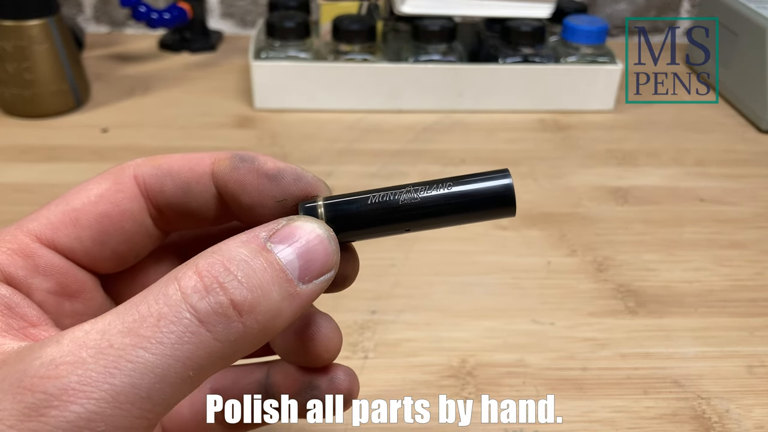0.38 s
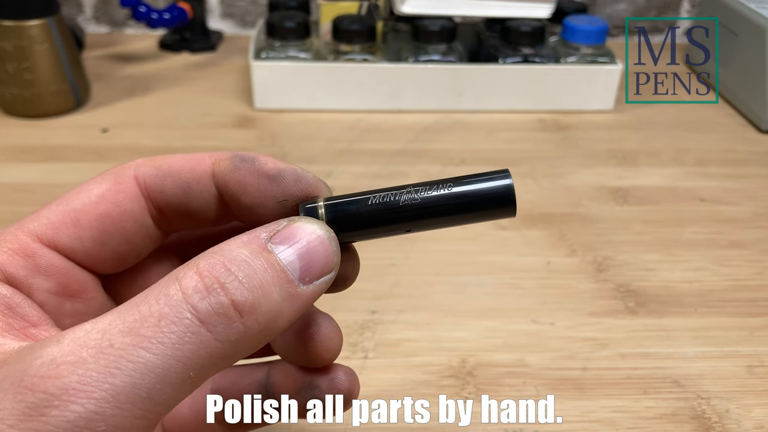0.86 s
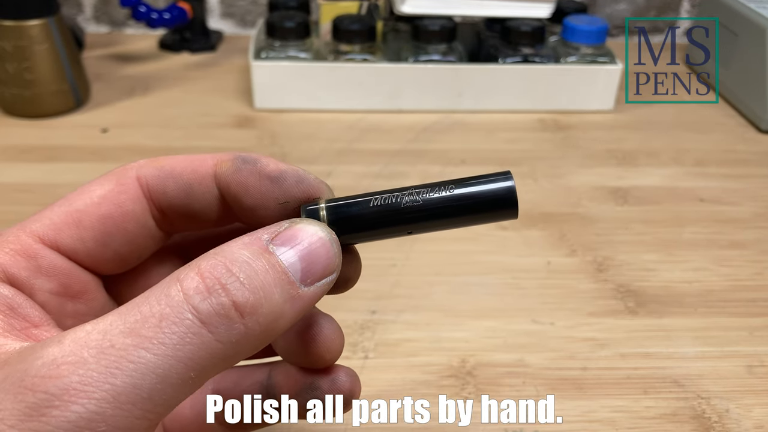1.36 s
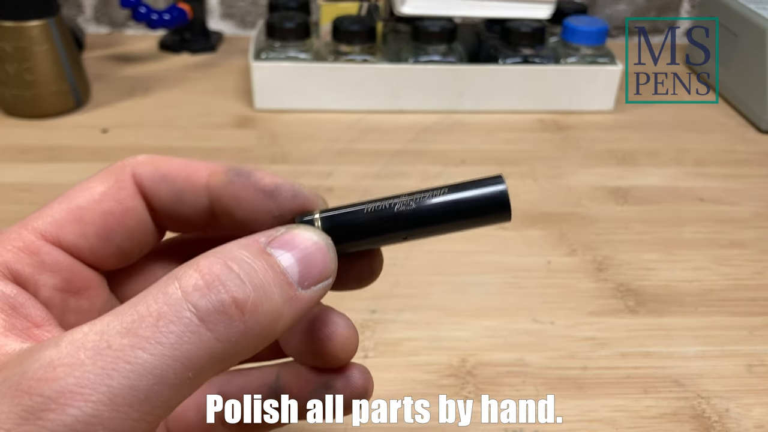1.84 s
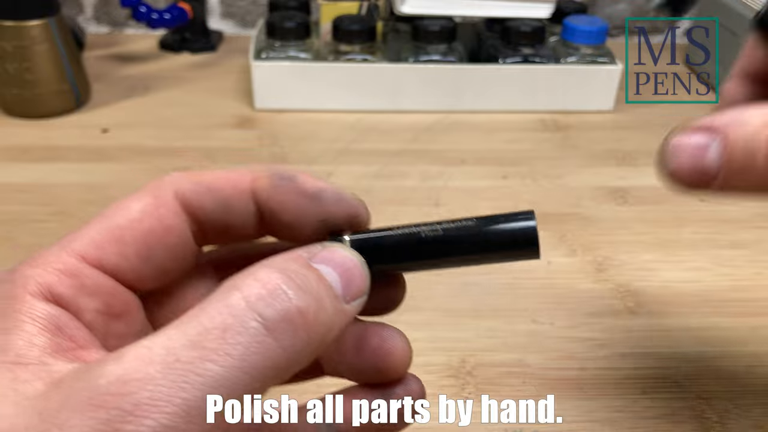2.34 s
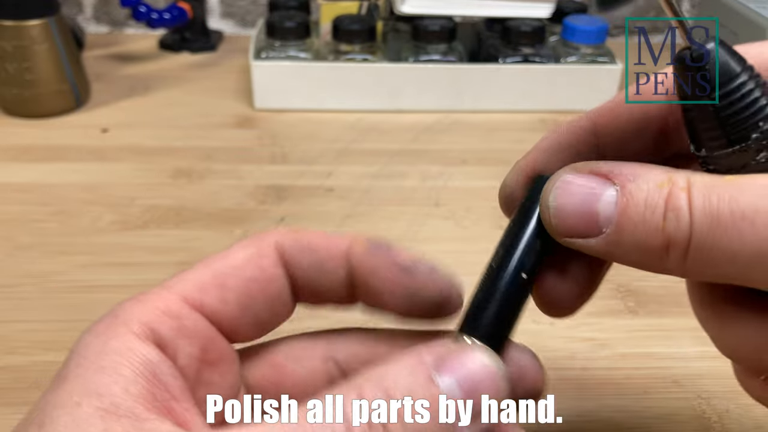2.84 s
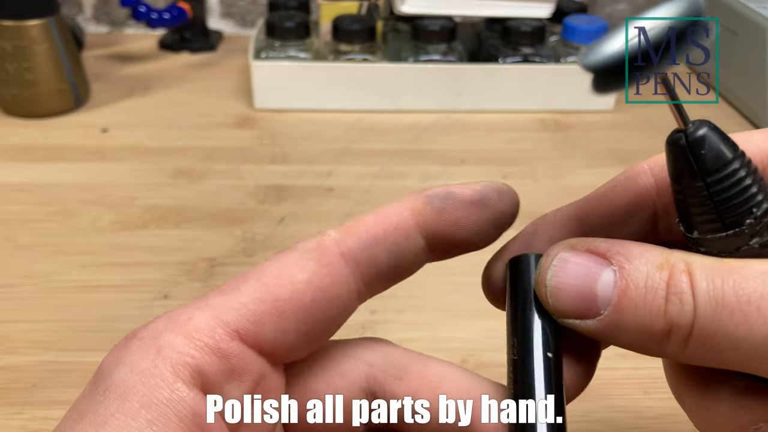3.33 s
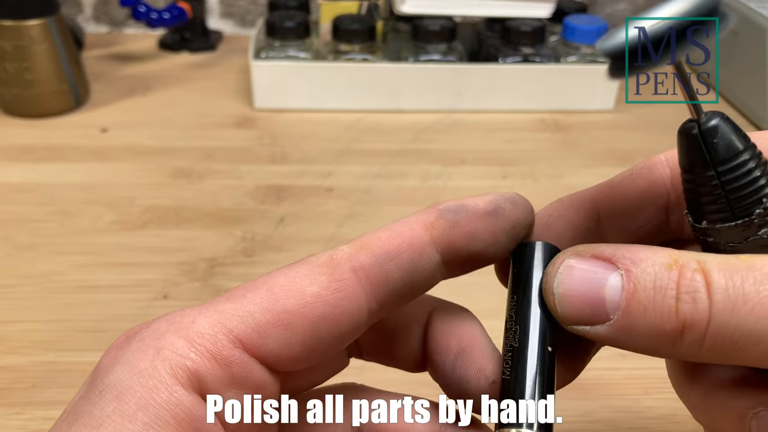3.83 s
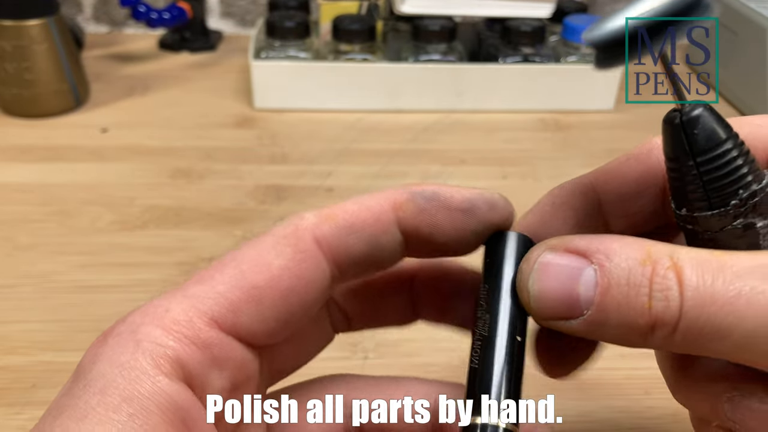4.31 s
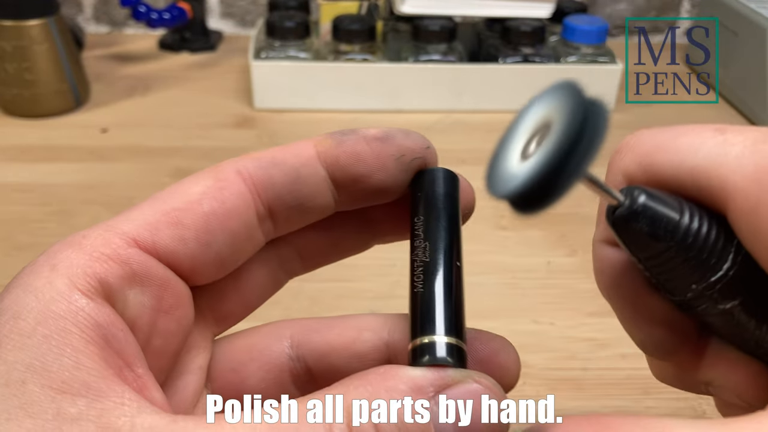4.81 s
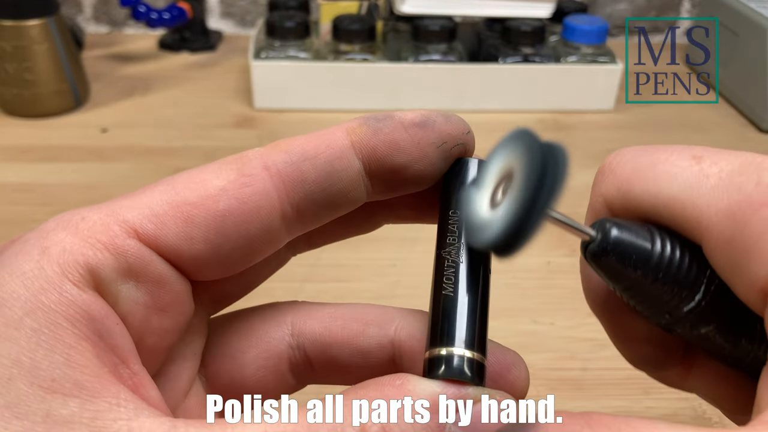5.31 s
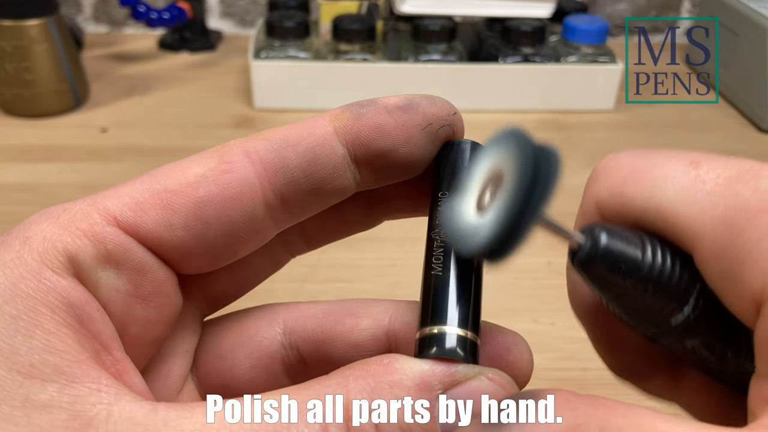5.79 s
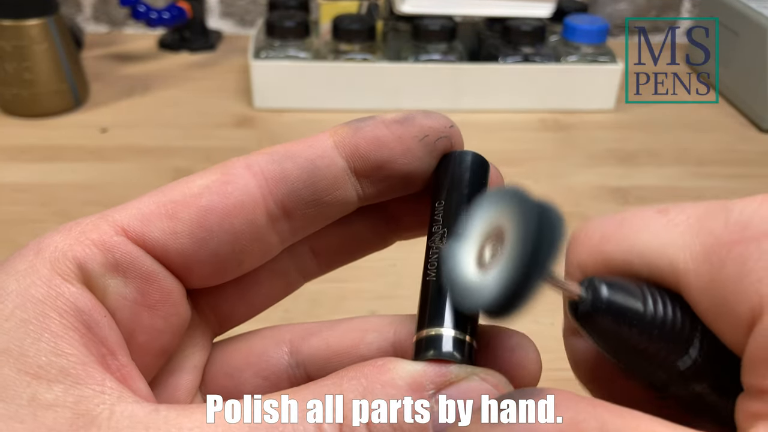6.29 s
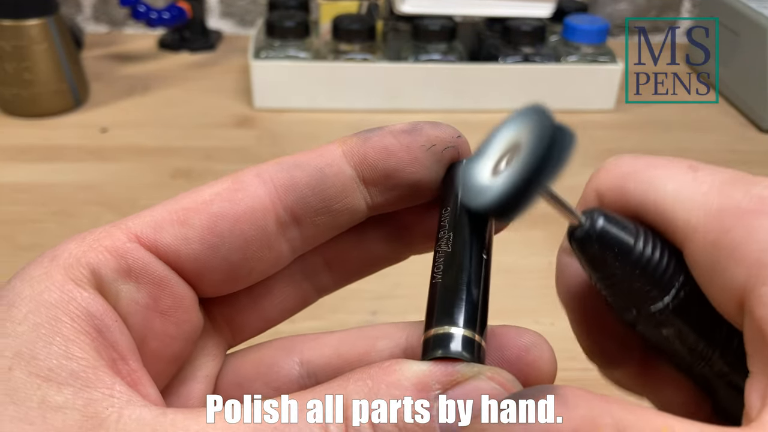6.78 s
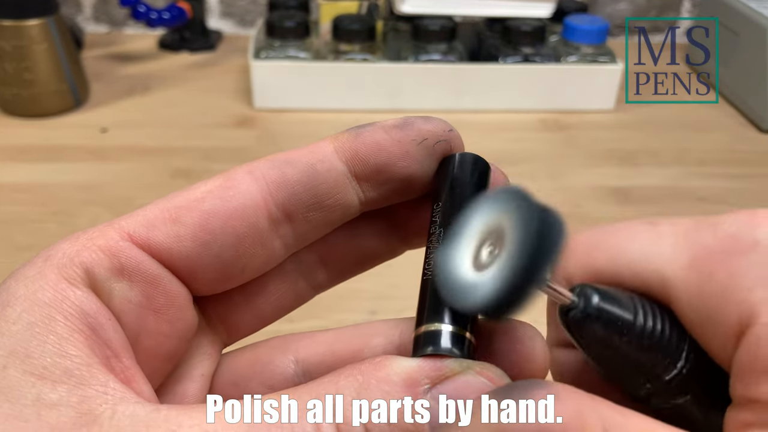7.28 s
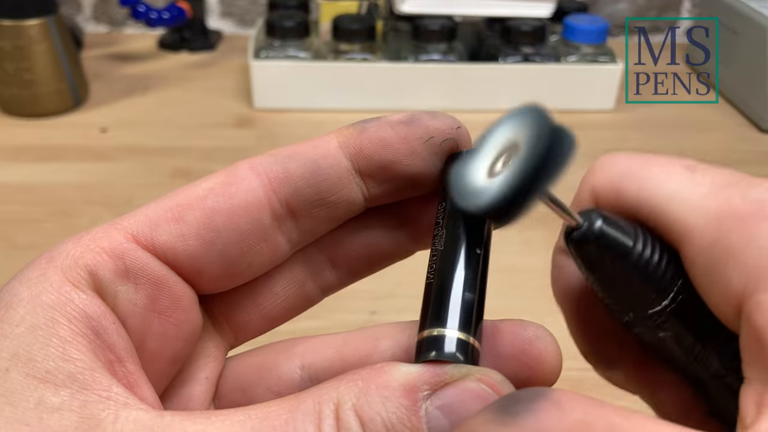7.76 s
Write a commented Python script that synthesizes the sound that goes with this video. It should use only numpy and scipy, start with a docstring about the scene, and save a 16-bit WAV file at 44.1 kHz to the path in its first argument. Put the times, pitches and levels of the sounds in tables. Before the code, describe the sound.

A small rotary tool whines faintly, is braked almost to a crawl, spins up loud and steady, then bogs and rasps against a plastic barrel.

```python
"""A small rotary tool with a soft polishing wheel runs close to a stereo microphone above a wooden bench.
Its motor sings on multiples of the shaft speed; brushes, bearings, air and rubbing add shaped noise.
It is braked almost to a crawl, spins up to its free whine, then bogs and recovers as the wheel is stroked
along a plastic barrel, which rings and is slapped once a turn by a high spot of the wheel.
Hands bump the bench softly as lumpy low noise; dull echoes and faint room air surround it all."""
import sys
import numpy as np
from scipy import signal
from scipy.fft import rfft, irfft, next_fast_len
from scipy.io import wavfile
from scipy.ndimage import uniform_filter1d

SR = 44100
rng = np.random.default_rng(int(sys.argv[2]) if len(sys.argv) > 2 else 0)


def waveform_to_disk(signal):
    """Save audio, clipped to [-1, 1], as 16-bit WAV at the path in sys.argv[1]."""
    frames = np.transpose(np.atleast_2d(signal))
    scaled = np.clip(frames, -1, 1) * 32767
    samples = np.round(scaled).astype(np.int16)
    wavfile.write(sys.argv[1], SR, samples)


def linear_from_db(decibels):
    """Turn decibels (scalar or array-like) into linear amplitude factors; 0 gives 1."""
    return 10 ** (np.asarray(decibels, float) / 20)


N = 347949

FREE_SPEED_HZ = 238.2  # turns per second when nothing brakes the shaft

# How alike the two ports (the stereo channels) are. Each row: frequency in Hz, share in common from 0 to 1.
LIKENESS = [(200, 0.8), (1000, 0.7), (2300, 0.8), (3200, 0.45), (4500, .5), (5500, 0.65), (6200, .65),
            (6700, .94), (9000, 0.93), (12000, 0.9), (15500, .85)]
# Noise colour of the tool turned aside. Each row: frequency in Hz, relative density in dB per Hz.
ASIDE = [(60, -9), (200, -3), (300, -4.5), (550, -13.5), (760, -0.5), (1150, -16), (1450, -9),
         (1850, -12.5), (2100, -4.5), (2400, -4.5), (2650, -14.5), (3080, 0), (3450, -14), (4300, -9),
         (4550, -1), (4900, -8), (5500, -13), (8000, -8.5), (11000, -2.5), (15500, -17)]


def rms_one(x):
    """Scale to rms 1."""
    return x / np.sqrt(np.mean(x ** 2) + 1e-20)


def in_time(rows):
    """Turn each column of a timed table into one value per sample, by straight lines."""
    s, *columns = np.transpose(rows)
    return [np.interp(np.arange(N) / SR, s, c) for c in columns]


def at_hz(points, hz):
    """Read a spectrum on a log-frequency axis."""
    points = np.array(points)
    return np.interp(np.log(hz + 1), np.log(points[:, 0]), points[:, 1])


def drift(rate, channels=1):
    """Slow chance of spread 1: noise at every 32nd sample through a double one-pole with its corner at rate Hz."""
    r = np.exp(-64 * np.pi * rate / SR)
    noise = rng.standard_normal((channels, N // 32 + 3001))
    slow = signal.lfilter([1], [1, -2 * r, r * r], noise)[:, 3000:]  # skip the settling of the filter
    slow = slow / slow.std(axis=1, keepdims=True)
    return np.repeat(slow, 32, axis=1)[:, :N]


def shaped(x, gain):
    """Multiply the spectrum by gain(Hz)."""
    size = next_fast_len(N + 4096)
    hz = np.arange(size // 2 + 1) * SR / size
    return irfft(rfft(x, size) * gain(hz), size)[..., :N]


def bands(hz, order=8):
    """Weights of buzz, whine, ring and hiss, low to high; they add up to one in power."""
    edges_hz = 1590, 3600, 6440
    below = [0 * hz] + [1 / (1 + (hz / edge) ** order) for edge in edges_hz] + [1 + 0 * hz]
    return np.sqrt(np.maximum(np.diff(below, axis=0), 0))


def by_pose(pose, count=6):
    """Weights of the ways of holding the tool; they add up to one."""
    return np.clip(1 - np.abs(pose - np.arange(count)[:, None]), 0, 1)


def swells(rows):
    """Sum of smooth humps given as (centre s, length s, dB)."""
    t = np.arange(N) / SR
    return sum(linear_from_db(db) * np.cos(np.pi * np.clip((t - s) / length, -.5, .5)) ** 2 for s, length, db in rows)


def band_levels(speed, pose, rise, along, ring_db):
    """Gains of buzz, whine, ring and hiss from nearness, pose, braking and rubbing."""
    # The tool between strokes: it fades as it is braked and grows as it comes near.
    # Each row: time in seconds, base level in dB, low buzz against that level in dB.
    tool_rows = [(0, -33, -20), (.2, -37.5, -18), (.42, -38.5, -8), (.7, -37, -9.5), (.98, -41.5, -0.5),
                 (1.08, -48, 3.5), (1.3, -49, 3.5), (1.55, -61, 6.5), (1.72, -46, 1), (1.82, -37, -15),
                 (2.05, -35, -14), (2.42, -23.5, -18.5), (2.72, -21, -19.5), (3.07, -24, -19),
                 (4.35, -23, -20), (4.6, -27, -14.5), (4.8, -24, -19.5), (5.3, -29.5, -9.5),
                 (5.75, -31, -9), (6.1, -31, -12.5), (7.0, -34, -9.5), (7.65, -30.5, -10),
                 (7.89, -29.5, -15)]
    # Each row is one pose: whine, ring and hiss against the base level in dB.
    band_db = [(-4.5, -6, -2), (-5, -9, -6), (-5.5, -11, -8), (-3.5, -7, -6), (-5, -12.5, -4),
               (-6.5, -8.5, -1.5)]
    braked_db_per_octave = 1.5, -5, 6     # whine, ring, hiss while the tool is turned aside
    rise_share = 0.53, 1, 1, 0.93         # share of a stroke's rise in buzz, whine, ring, hiss
    slide_db = 2.5, 5, 4.5, 0.5           # change of each band from start to end of a stroke
    flicker_db, flicker_hz = 0.5, 11      # each band wavers on its own
    level_db, buzz_db = in_time(tool_rows)
    held = by_pose(pose)
    octaves = np.log2(speed / FREE_SPEED_HZ)
    upper_db = np.transpose(band_db) @ held + np.outer(braked_db_per_octave, held[0] * octaves)
    rubbed_db = np.outer(rise_share, rise) + np.outer(slide_db, along) + np.outer([0, 0, 1, 0], ring_db)
    flicker = flicker_db * drift(flicker_hz, channels=4)
    return linear_from_db(level_db + np.vstack([buzz_db, upper_db]) + rubbed_db + flicker)


def motor_tones(turns, speed, levels, pose, count=40):
    """Multiples of the speed, nearly in step so that they bunch once a turn; each wavers, partly apart per port."""
    # Motor tones as the housing passes them, one list for each of the first five poses.
    # Each row: multiple of the free speed, relative level in dB.
    housing = [
        [(3, -1), (4, -6), (5, 3.5), (6, 4.5), (7, -6), (8, -4), (9, -1), (10, -10), (11, 10), (12, 12),
         (13, 0), (14, 7), (15, -12), (16, -15), (17, -4), (18, 6), (19, 4), (20, -6), (21, -23), (22, -9),
         (23, -14), (24, -28)],
        [(3, -3), (4, -9), (5, -6.5), (6, -7), (7, -19), (8, -10), (9, -4), (10, 0.5), (11, -19), (12, 4),
         (13, -3), (14, 2), (15, -9), (16, -1), (17, -3), (18, -7), (19, -11), (20, 3), (21, 12), (22, -3),
         (23, -12), (24, 2)],
        [(3, -13), (4, -23), (5, -26), (6, -15), (7, -19), (8, -13), (9, -6), (10, 4), (11, 7.5), (12, -10),
         (13, 12.5), (14, 0), (15, -20), (16, 3), (17, -17), (18, 7), (19, 0), (20, -6), (21, -2), (22, -12),
         (23, -13), (24, -10)],
        [(3, -8.5), (4, -44), (5, -7.5), (6, -15), (7, -12), (8, -8), (9, -8.5), (10, 0.5), (11, 3.5), (12, -3),
         (13, 3), (14, 8.5), (15, -13.5), (16, -9.5), (17, -5), (18, -21), (19, -23), (20, -18), (21, -6),
         (22, -16), (23, -17), (24, -11)],
        [(3, -14.5), (4, -16), (5, -38), (6, -8.5), (7, -45), (8, -9), (9, -4), (10, -1.5), (11, 2), (12, 3),
         (13, 4.5), (14, 1), (15, -7), (16, -12), (17, -22), (18, -16), (19, -17), (20, -4), (21, -7),
         (22, -16), (23, -10), (24, -21)],
    ]
    # Colour of the tones at the barrel. Each row: frequency in Hz, relative level in dB.
    barrel = [(300, -45), (480, -16.5), (600, -6.5), (710, 0.5), (850, -25.5), (1020, -4.5), (1250, -14.5),
              (1450, -4.5), (1800, -14), (2250, -4.5), (2800, -2), (3400, -4.5), (4200, -1), (6000, -3)]
    # Level of the buzz, and of whine and ring together, in each pose in dB.
    buzz_db, whine_db = [0.0, -4.5, -12.0, -6.0, -4.5, -4.0], [-4.0, 0.0, -2.5, -4.0, -3.5, -7.5]
    ring_db = 0.5
    waver_db, waver_rad, waver_hz = 0.5, 0.44, 3.7
    surge_db, surge_hz, free_surge = 5.5, 12, .35  # quick surging; its share when running free
    clear_above_hz = 232                           # below this speed braking blurs the whine

    out, power = np.zeros((3, 2, N)), np.full((3, N), 1e-4)
    colours = [np.array(orders) * [FREE_SPEED_HZ, 1] for orders in housing] + [barrel]
    slow_speed, held = speed[::32], by_pose(pose[::32])
    at_barrel = by_pose(pose)[-1]
    braked = (1 - held[-1]) * np.clip((clear_above_hz - slow_speed) / 30, 0, 1)
    shaky = np.maximum(held[-1] + braked, free_surge)
    for k in range(3, count + 1):
        hz = k * slow_speed
        colour_db = sum(weight * at_hz(colour, hz) for weight, colour in zip(held, colours))
        # Braked while turned aside, the tones take the colour of the noise.
        colour_db += held[0] * braked * (at_hz(ASIDE, hz) - colour_db)
        gain = np.repeat(linear_from_db(colour_db) * bands(hz)[:3], 32, axis=1)[:, :N]
        both, level, left, right = drift(waver_hz, channels=4)
        apart = 1 - at_hz(LIKENESS, k * FREE_SPEED_HZ)
        lag = rng.normal(0, 0.5) + apart * rng.normal(0, 0.8, (2, 1))
        surge = surge_db * min(1, 8 / k) * shaky * drift(surge_hz)[0, ::32]
        flutter = np.repeat(linear_from_db(waver_db * level[::32] + surge), 32)[:N]
        waver = waver_rad * (both + apart * np.array([left, right]))
        tone = flutter * np.sin(2 * np.pi * k * turns + lag + waver)
        out += gain[:, None] * tone
        power += gain ** 2 / 2
    out /= np.sqrt(power)[:, None]

    # A braked or crawling motor has no clear whine.
    blurred = (1 - at_barrel) * np.clip((clear_above_hz + 5 - speed) / 12, 0, .9)
    clear = np.clip((speed - 85) / 60, 0, 1) * (1 - blurred)
    buzz = linear_from_db(np.dot(buzz_db, by_pose(pose))) * levels[0] * out[0]
    buzz = buzz * np.clip((speed - 55) / 60, .15, 1)
    buzz = buzz * np.repeat(1 - braked * (.7 - 0.48 * held[0]), 32)[:N]
    upper = levels[1] * out[1] + linear_from_db(ring_db) * levels[2] * out[2]
    return buzz + clear * linear_from_db(np.dot(whine_db, by_pose(pose))) * upper


def gate(turns, speed):
    """Noise swells once a turn and a high spot of the wheel slaps in a short burst, weaker in the low bands."""
    # How sharply the high spot slaps. Each row: time in seconds, slap against the steady rubbing in dB.
    slap_rows = [(0, -20), (.45, -8), (.6, 5), (1.0, -4), (5.3, -3.5), (5.36, 13), (5.62, 11), (5.7, -20),
                 (5.82, 5), (5.84, 10), (5.95, 7.5), (6.13, 6), (6.16, 10.5), (6.38, 8.5), (6.42, -6),
                 (6.5, 7.5), (6.68, 8.5), (6.8, -3), (6.93, 8), (7.02, 14), (7.05, 1.5), (7.5, 5.5),
                 (7.6, 6), (7.66, 8), (7.74, 12), (7.8, 3), (7.89, 6)]
    slap_s = .0004                    # time from the start of a slap to its peak
    dull_db, uneven_db = -4.5, 1.3    # loss in the low bands; spread from turn to turn
    turn = turns.astype(int)
    since = (turns - turn) / speed
    uneven = uneven_db * rng.standard_normal(turn[-1] + 1)[turn]
    strength = linear_from_db(in_time(slap_rows)[0] + uneven)
    slap = linear_from_db([[dull_db], [0]]) * strength * since / slap_s * np.exp(1 - since / slap_s)
    shape = 1 + 0.13 * np.cos(2 * np.pi * turns - 1) + slap
    return shape / np.sqrt(uniform_filter1d(shape ** 2, size=1024))  # even out the average power


def rush(shape, levels, pressure, pose, turns, speed):
    """Brushes, bearings, air and rubbing: gated noise, part of it repeating each turn as the same fibres pass."""
    # Noise colours of the other five poses. Each row: frequency in Hz, relative density in dB per Hz.
    coming, free, still = [(60, -29), (200, -29), (700, -19), (1100, -22.5), (2000, -9), (2600, 1.5),
                           (3200, 0), (4000, 0.5), (4800, -1), (5300, -3), (5750, -2), (6300, -15),
                           (7500, -9.5), (9000, -7), (11000, -4.5), (13000, -9), (15500, -16)], [(60, -36), (200, -20), (380, -22), (700, -18), (1100, -19),
                                           (2000, -11.5), (2600, -4), (3200, 0.5), (3900, -11), (5500, 1),
                                           (6500, -3), (8000, 4.5), (9000, -1), (11000, 3.5), (13000, -1),
                                           (15500, -9)], [(60, -26), (200, -21), (380, -26), (700, -12),
                                                         (1100, -18), (2000, -12.5), (2600, -9.5),
                                                         (3200, -1), (3900, -10), (5200, -5), (6300, -9),
                                                         (8000, -6), (9000, -4), (11000, 1.5), (13000, -6),
                                                         (15500, -6)]
    lowered, pressed = [(60, -30), (200, -18), (380, -25), (700, -18), (1100, -19), (2000, -12.5),
                        (2600, 0), (3200, -1.5), (3900, -11), (5000, -8.5), (6200, -8), (8000, -9),
                        (9000, -7), (11000, 0), (13000, -6.5), (15500, -12)], [(60, -26), (200, -22), (450, -24), (750, -12.5), (1500, -14.5),
                                         (2250, -4), (2800, -5), (3300, -2), (4100, -0.5), (4800, -1.5),
                                         (5600, -2.5), (6800, -3), (7800, 3), (9000, 5.5), (11000, 6.5),
                                         (15500, -6)]
    # Each row is one pose: share of the noise in buzz, whine, ring and hiss in dB.
    shares_db = [[-4.0, 2.0, -11.0, 2.8], [-0.5, -3.5, 3.0, 3.4], [-5.5, -4.5, 2.5, 1.8],
                 [-5.5, -8.5, -4.0, 1.66], [-3.5, -5.5, 0.5, 3.0], [-4.5, -3.0, -3.0, 1.8]]
    keep = .92  # likeness of the fibres from one turn to the next
    turn = turns.astype(int)
    place = np.minimum(((turns - turn) / speed * SR).astype(int), 899)  # samples since the turn began
    fresh = rng.standard_normal((turn[-1] + 1, 900))
    fibres = signal.lfilter([np.sqrt(1 - keep ** 2)], [1, -keep], fresh, axis=0)
    repeated = np.clip(0.057 + 0.87 * pressure, 0, .95)
    white = rng.standard_normal((3, N))
    common = np.sqrt(repeated) * fibres[turn, place] + np.sqrt(1 - repeated) * white[0]

    def alike(hz):
        return np.clip(at_hz(LIKENESS, hz), 0, 1)

    ports = []
    for g in shape:
        shared = shaped(common * g, lambda hz: np.sqrt(alike(hz)))
        own = shaped(white[1:] * g, lambda hz: np.sqrt(1 - alike(hz)))
        ports.append(shared + own)
    out = np.zeros((2, N))
    colours = ASIDE, coming, free, still, lowered, pressed
    for weight, colour, share_db in zip(by_pose(pose), colours, shares_db):
        for band, level in enumerate(levels):
            # The two low bands take the dull gate, the two high ones the sharp gate.
            part = shaped(ports[band // 2], lambda hz: linear_from_db(at_hz(colour, hz)) * bands(hz)[band])
            out += weight * linear_from_db(share_db[band]) * level * rms_one(part)
    return out * linear_from_db(0.72 * drift(3.2))


def bearing(turns, whine, pose):
    """Rolling balls beat against the shaft: thin, slowly wavering tones beside the multiples."""
    # Each row: multiple of the speed, side (1 above or -1 below), level in dB before the pose level.
    side_tones = [(6, -1, -22), (7, -1, -31.5), (8, 1, -24), (10, -1, -14.5), (11, 1, -31), (12, 1, -16),
                  (13, 1, -10.5), (14, -1, -17), (16, -1, -28), (17, -1, -19), (20, 1, -24), (5, -1, -30.5)]
    pose_db = [-7.0, -1.0, -1.0, -2.0, -4.0, -23.0]
    ball_offset = .222  # distance from the multiple, in cycles per turn
    out = np.zeros(N)
    for multiple, side, level_db in side_tones:
        level, lag = drift(2.15, channels=2)
        order = round(multiple) + np.sign(side) * ball_offset
        out += linear_from_db(level_db + 3.8 * level) * np.sin(2 * np.pi * order * turns + .5 * lag)
    return np.sqrt(2) * linear_from_db(np.dot(pose_db, by_pose(pose))) * whine * out


def shake(turns, speed, pose):
    """The unbalanced wheel shakes the tool once and twice a turn, harder when fast; braked or loaded, it judders."""
    # Each row is one pose: rms level in dB at free speed, once a turn and twice a turn.
    shake_db = [(-54.5, -67), (-46.5, -56.5), (-40, -51), (-40.5, -51.5), (-41, -59), (-36, -61.5)]
    # Each row: centre in seconds, length in seconds, multiple of the speed, rms level at the centre in dB.
    judders = [(0.567, 0.19, 1, -48), (0.521, .08, 2, -46), (0.74, 0.11, 1, -51), (0.783, 0.089, 3, -62),
               (0.833, 0.094, 2, -49), (0.89, 0.35, 3, -53), (0.927, 0.12, 2, -47), (1.033, 0.12, 2, -40),
               (1.13, 0.27, 6, -58.5), (1.155, 0.37, 4, -59), (1.267, 0.11, 2, -41.5),
               (1.41, 0.089, 1, -50), (1.494, 0.058, 2, -49), (1.631, 0.046, 2, -47),
               (5.493, 0.48, 2, -51.5), (5.777, 0.25, 2, -53), (6.08, 0.12, 2, -56), (6.235, 0.099, 2, -56),
               (6.61, 0.43, 3, -58), (7.682, 0.35, 2, -55)]
    db_per_octave = 31.5, 6.5  # growth with speed, once and twice a turn
    db = np.transpose(shake_db) @ by_pose(pose) + np.outer(db_per_octave, np.log2(speed / FREE_SPEED_HZ))
    once, twice = linear_from_db(db + [[1.0], [1.5]] * drift(2.5, channels=2))
    out = once * np.sin(2 * np.pi * turns) + twice * np.sin(4 * np.pi * turns + 1)
    for s, length, multiple, level_db in judders:
        out += swells([(s, length, level_db)]) * np.sin(2 * np.pi * round(multiple) * turns)
    return np.sqrt(2) * out


def workshop(x):
    """Dense dull early echoes from bench and walls, other ones in each port."""
    t60_s, wet_db, dull_hz = .1, -16.0, 4000  # time to fall by 60 dB, echo level, treble corner
    t = np.arange(SR // 5) / SR
    tail = rng.standard_normal((2, len(t))) * linear_from_db(-60 * t / t60_s) * (t > .003)
    tail /= np.sqrt(np.sum(tail ** 2, axis=1, keepdims=True))
    tail = signal.lfilter(*signal.butter(1, dull_hz, fs=SR), tail)
    return linear_from_db(wet_db) * signal.fftconvolve(x, tail, axes=1)[:, :N]


def arrival(x, pose):
    """Each way of holding the tool reaches the two ports with its own balance and phase."""
    # Each row: frequency in Hz, then the lead of the right port in radians in each of the six poses.
    # Read by straight lines in Hz; the slope brings the treble about a fifth of a millisecond early.
    leads = np.array([(240, .3, -.2, -.6, -.6, -.4, -.3), (700, 1.1, 0, -.4, -.4, -.3, -.1),
                      (1400, 1.4, .2, 0, .2, -.1, -.3), (2070, 2.5, 1.2, -.1, -.2, -.5, -.5),
                      (2750, 3.0, 2.2, -.1, .1, -1.5, -1.8), (3450, 4.3, .4, -.3, -2.0, -1.8, -1.5),
                      (4130, 5.2, .6, 0, .3, -.2, -.2), (4800, 5.8, 2.4, 1.4, .5, -.7, -.8),
                      (5500, 4.8, 3.9, 3.1, 4.1, -1.9, -2.5), (6200, 5.0, 5.0, 5.8, 5.7, -1.0, -1.0),
                      (6900, 6.3, 6.3, 6.3, 6.3, 0.0, 0.0), (15800, 18.6, 18.6, 18.6, 18.6, 12.3, 12.3)])
    # Each row: frequency in Hz, then left minus right in dB in each of the six poses.
    balance = np.array([(200, 1, 0.5, 0.0, -1.0, -1.5, 2.5), (1020, -1.5, -2.3, 1.0, -0.5, 3.5, 2),
                        (2200, 2.5, 1.6, 1.5, 3, 2, 2), (3200, 1.5, 1, 3, 1.5, 8.5, 8),
                        (4300, 0.5, 0.5, 2, 3, 5.5, 3), (5600, 3, -0.45, 2, -1.5, 4, 1),
                        (8000, 0.0, 0.0, 0, -0.5, -0.5, 0.0)])
    out = np.zeros((2, N))
    for k, weight in enumerate(by_pose(pose), start=1):
        def port_gains(hz):
            half = linear_from_db(at_hz(balance[:, [0, k]], hz) / 2)
            lead = np.exp(1j * np.interp(hz, leads[:, 0], leads[:, k]))
            return np.array([half, lead / half])
        out += weight * shaped(x, port_gains)
    return out


def room_air():
    """Still air of the workshop: faint steady noise, half alike in the two ports."""
    # Each row: frequency in Hz, relative density in dB per Hz.
    air_colour = [(180, -29), (300, -11), (553, -18), (821, -18), (2700, -25), (4570, -24), (9290, -18),
                  (11100, -6), (13600, -26), (15500, -22)]
    white = rng.standard_normal((3, N))
    air = shaped(white[0] + white[1:], lambda hz: linear_from_db(at_hz(air_colour, hz)))
    return linear_from_db(-59.5) * rms_one(air)


def strokes():
    """Rubbing wheel: rise in dB, how far along its stroke it is (-.5 to .5), and extra ring in dB."""
    # The wheel meets something and rubs; the faint rows are brief swells.
    # Each row: start in seconds, length in seconds, rise in dB at the start, rise in dB at the end, extra ring in dB.
    stroke_rows = [(0.21, 0.22, -2, 1, 5.5), (0.451, 0.041, 9.5, 11, 6.5), (0.62, 0.041, 2, 3, -1),
                   (1.767, 0.015, 5, 1.5, 4), (4.387, 0.029, 4, -2.5, -0.5), (5.352, 0.27, 11, 7, -3),
                   (5.831, 0.086, 14.5, 8, -2), (6.046, 0.049, 11.5, -3, 4), (6.138, 0.165, 12.5, 5, -5),
                   (6.307, 0.097, 11.5, 4.5, -0.5), (6.441, 0.46, 8.5, 8, -1), (7.025, 0.54, 10, 5, -2.5),
                   (7.734, 0.11, 6.5, 4.5, -2.5)]
    bite_s, lift_s = 0.0043, 0.053  # a stroke sets in fast and lets go slowly
    t = np.arange(N) / SR
    rise, along, ring_db = np.zeros((3, N))
    for s, length, first_db, last_db, extra_db in stroke_rows:
        touch = np.interp(t, [s, s + bite_s, s + length, s + length + lift_s], [0, 1, 1, 0])
        way = np.clip((t - s) / length, 0, 1)
        rise = np.maximum(rise, touch * (first_db + (last_db - first_db) * way))
        along += touch * (way - .5)
        ring_db += touch * extra_db
    return rise, along, ring_db


def bumps():
    """Hands on the bench: lumpy low noise, mostly alike in both ports; hard bumps reach deeper."""
    # Each row: centre in seconds, length in seconds, relative strength in dB.
    bump_rows = [(.46, 0.1, -60), (.59, .1, -65), (.74, .1, -63), (1.14, 0.18, -50), (1.3, .1, -45),
                 (1.38, .08, -37), (1.56, 0.079, -39), (1.76, 0.11, -44), (1.86, 0.15, -39.5),
                 (2.69, 0.16, -40.5), (2.88, 0.16, -44), (3.12, 0.1, -41), (3.22, 0.13, -37),
                 (3.36, 0.089, -50), (3.8, 0.13, -49), (4.29, 0.15, -38), (4.75, 0.15, -44),
                 (5.03, .2, -59), (5.85, 0.16, -55), (6.02, 0.093, -59)]
    rest = linear_from_db(-64 + 6.6 * drift(7.3)[0])  # uneven rumble between bumps
    level_db = 20 * np.log10(rest + swells(bump_rows))
    noise = rng.standard_normal((2, 3, N))
    thud_band = signal.butter(3, [49.0, 135], "band", fs=SR, output="sos")
    deep_band = signal.butter(3, [30, 68], "band", fs=SR, output="sos")
    thud, deep = signal.sosfilt(thud_band, noise[0]), signal.sosfilt(deep_band, noise[1])
    deep_db = -77.5 + 1.52 * (level_db + 57.0)  # grows faster than the thud
    thuds = linear_from_db(level_db - 8.5) * rms_one(thud[0] + 0.55 * thud[1:])
    return thuds + linear_from_db(deep_db) * rms_one(deep[0] + 0.34 * deep[1:])


def ticks():
    """Something catches in the slowed tool: short dry bursts of noise."""
    # Each row: start in seconds, noise level at the start in dB before the low cut.
    tick_rows = [(1.567, -39), (1.789, -25), (1.798, -24), (1.811, -29)]
    decay_s, above_hz = 0.001, 900
    t, noise = np.arange(N) / SR, rng.standard_normal(N)
    burst = sum(linear_from_db(db) * (t >= s) * np.exp(-np.maximum(t - s, 0) / decay_s) for s, db in tick_rows)
    return signal.sosfilt(signal.butter(2, above_hz, "high", fs=SR, output="sos"), burst * noise)


def moving_ring(x, rows, width_hz, size=128):
    """A resonance whose centre moves along rows (s, Hz, dB), stepped in blocks with the state carried on."""
    hz, db = in_time(rows)
    out, state, r = np.zeros_like(x), np.zeros((2, 2)), np.exp(-np.pi * width_hz / SR)
    for i in range(0, N, size):
        poles = [1, -2 * r * np.cos(2 * np.pi * hz[i] / SR), r * r]
        zeros = [(1 - r * r) / 2, 0, (r * r - 1) / 2]
        out[:, i:i + size], state = signal.lfilter(zeros, poles, x[:, i:i + size], zi=state)
    return linear_from_db(db) * out


def bench_dip(tool):
    """The echo off the bench cancels a band that moves with the tool: a moving resonance to be subtracted."""
    # Each row: time in seconds, centre in Hz, cancelling part in dB (0 cancels the centre fully).
    dip_rows = [(0, 6800, -36), (2.0, 7140, -7), (2.22, 6860, -13), (2.32, 5800, -3), (2.45, 5850, 0),
                (2.62, 5600, -9), (2.77, 5900, 3), (2.9, 6000, -4), (3.05, 6760, -6), (3.3, 6900, -41),
                (4.45, 5500, -37), (4.65, 5600, -6), (4.95, 6350, 1), (5.2, 6200, 4), (5.36, 5800, -30),
                (7.89, 5800, -34)]
    return moving_ring(tool, dip_rows, width_hz=940)


def barrel_ring(tool):
    """The hollow barrel, driven by the tool, rings at another pitch as the wheel moves along it."""
    # Each row: time in seconds, pitch in Hz, ring against the tool in dB.
    ring_rows = [(5.2, 2200, -52), (5.3, 2200, -14), (5.38, 2070, 1.5), (5.46, 2250, 0), (5.5, 3500, 1),
                 (5.6, 3540, -1), (5.7, 3030, -6), (5.86, 3270, -6), (6.0, 3240, -10), (6.12, 2310, -20),
                 (6.2, 2200, -4), (6.25, 3800, -5), (6.33, 3750, -4), (6.4, 2200, -12), (6.52, 2330, 1),
                 (6.6, 3330, -13), (6.72, 2400, -0.5), (6.9, 2480, -11), (7.0, 3200, 6.5),
                 (7.06, 2280, -2.5), (7.2, 2380, 1), (7.26, 4030, -1), (7.34, 4100, -10), (7.4, 2300, -8),
                 (7.55, 2500, -8), (7.68, 3200, 2), (7.78, 2370, -14), (7.89, 2600, 2)]
    return moving_ring(tool, ring_rows, width_hz=650)


def scene():
    """Turn and press the wheel, add up the sounds of the tool, then place it among echoes, bumps and air."""
    # Speed of the shaft before smoothing. Each row: time in seconds, turns per second.
    speed_rows = [(0, 237.7), (.42, 237.7), (.46, 200), (.53, 132), (.59, 117), (.66, 124), (.72, 112),
                  (.81, 90), (.9, 90.5), (1.0, 72), (1.08, 59), (1.15, 54), (1.27, 66), (1.47, 75),
                  (1.7, 73), (1.76, 116), (1.84, 200), (1.88, 220), (1.96, 237), (2.06, 239.2),
                  (2.7, 238.3), (5.14, 237.6), (5.25, 231), (5.31, 215), (5.41, 169), (5.56, 159),
                  (5.62, 165), (5.73, 200), (5.78, 205), (5.84, 192), (5.92, 170), (6.02, 185),
                  (6.13, 191.5), (6.2, 172), (6.3, 152), (6.48, 173), (6.61, 143), (6.7, 149),
                  (6.75, 141.5), (6.83, 153), (7.0, 115), (7.14, 153), (7.19, 155), (7.29, 138),
                  (7.34, 139), (7.48, 168), (7.6, 136), (7.67, 127), (7.76, 130), (7.82, 147), (7.89, 134)]
    # How the tool is held: 0 turned aside, 1 coming close, 2 raised, 3 held still, 4 lowered, 5 at the barrel.
    # Each row: time in seconds, pose number; values between two poses blend them.
    pose_rows = [(0, 0), (1.88, 0), (2.1, 1.4), (2.3, 1), (2.45, 1.34), (2.62, 2), (2.9, 2.5), (3.45, 3),
                 (3.7, 3), (4.38, 3), (4.48, 4), (5.15, 3.5), (5.33, 4.5), (5.37, 5), (7.89, 5)]
    inertia_s = .035                          # the rotor rounds off changes of speed
    resting, brake_press = 0.22, 0.24         # pressure between strokes; pressure added by braking to a stop
    full_press_db = 13                        # rise of a stroke that adds 1 to the pressure
    drag_turns, drag_hz = .015, 30            # rubbing makes the shaft run unevenly: spread at full pressure, rate

    speed, pose = in_time(speed_rows)[0], in_time(pose_rows)[0]
    speed = uniform_filter1d(speed, size=int(inertia_s * SR))
    held = by_pose(pose)
    rise, along, ring_db = strokes()
    levels = band_levels(speed, pose, rise, along, ring_db)
    braking = brake_press * held[0] * (1 - speed / FREE_SPEED_HZ)
    pressure = np.clip(resting + held[-1] * rise / full_press_db + braking, 0, 1)
    turns = np.cumsum(speed) / SR
    dragged = turns + drag_turns * pressure * uniform_filter1d(drift(drag_hz)[0], size=64)

    tool = motor_tones(dragged, speed, levels, pose)
    tool = tool + rush(gate(turns, speed), levels, pressure, pose, turns, speed)
    near_full_speed = np.clip((speed - 190) / 40, 0, 1)
    tool = tool + bearing(turns, levels[1] * near_full_speed, pose)
    tool = tool + ticks()
    tool = tool + barrel_ring(tool)
    tool = tool - bench_dip(tool)
    heard = tool + workshop(tool) + shake(turns, speed, pose)
    return arrival(heard, pose) + bumps() + room_air()


def top_cut(x):
    """Nothing passes above the cut-off."""
    return signal.sosfilt(signal.butter(12, 17100, fs=SR, output="sos"), x)


def record(dry):
    """A steep top cut, a bass cut and softly rounded peaks finish the mix."""
    ports = signal.sosfilt(signal.cheby2(14, 60, 16100, fs=SR, output="sos"), dry)
    ports = signal.sosfilt(signal.butter(2, 45, "high", fs=SR, output="sos"), ports)
    ports = .98 * np.tanh(ports / .98)
    return top_cut(ports)


dry = scene()
out = record(dry)
waveform_to_disk(out)
```